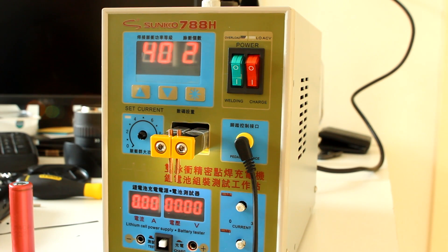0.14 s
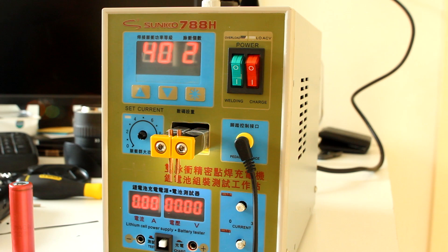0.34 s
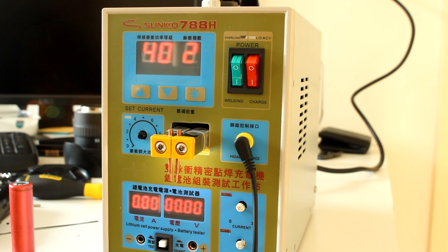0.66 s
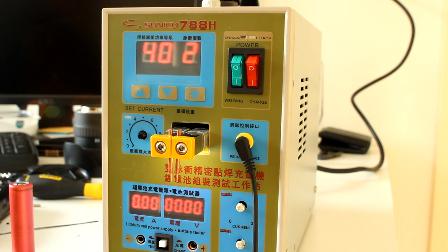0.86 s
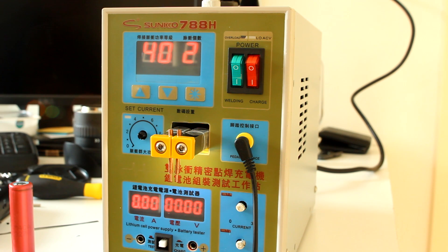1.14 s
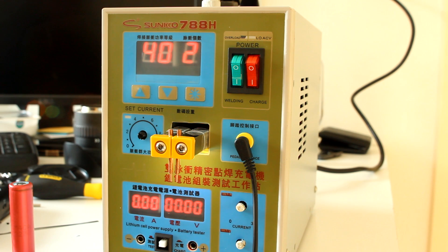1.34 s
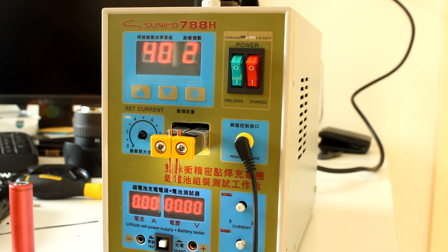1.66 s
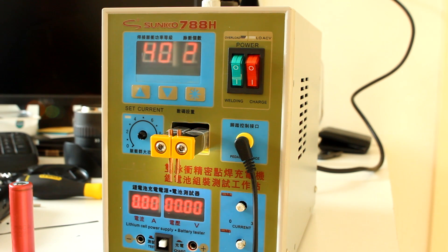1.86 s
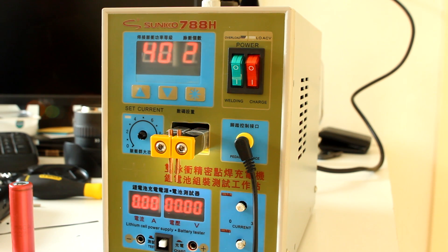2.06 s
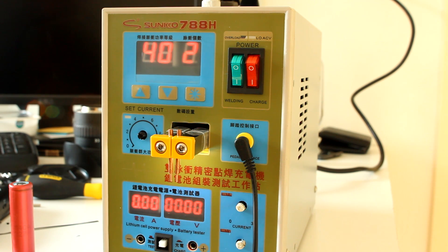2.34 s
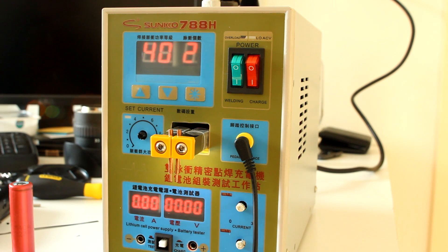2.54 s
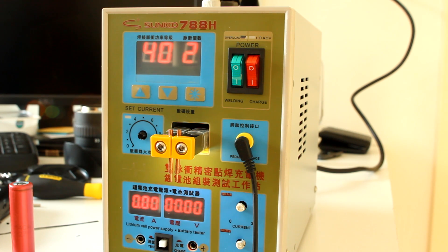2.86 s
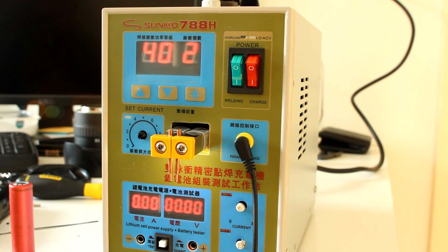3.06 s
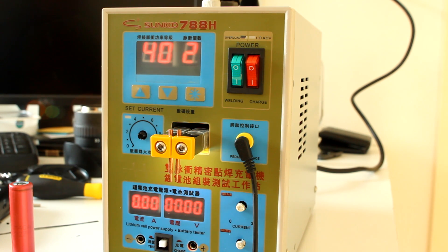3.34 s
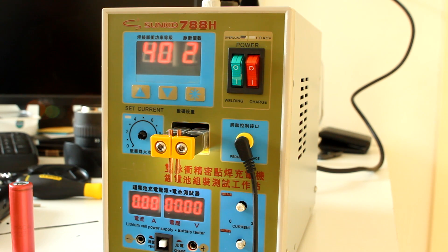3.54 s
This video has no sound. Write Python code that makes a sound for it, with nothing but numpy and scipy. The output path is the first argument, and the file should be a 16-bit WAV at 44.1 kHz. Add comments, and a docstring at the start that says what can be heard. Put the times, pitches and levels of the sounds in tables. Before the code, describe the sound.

A foot pedal switch clacks irregularly in a small live room. Loose knocks fall at 0.1-0.2 and 0.4 seconds, around a faint motor whine that stops by 0.75. A light tick at 0.8, a thump and snapping clack near 1.1, then soft rustle. Scrapes lead into click clusters at 1.8, 2.1, 2.45 and 2.75; after a pause, a last light click at 3.6. Faint hum, hiss and deep rumble continue.

```python
"""A foot pedal's treadle ticks and knocks against its housing, on the floor of a small, live room.
Each knock is a blow spectrum ringing the housing, heard as a direct crack and as echoes from the walls.
The switch inside snaps over with a thin metal ring, the hinge scrapes, and the foot thumps and rustles.
Behind it lie sine mains hum, noise-made hiss and slow deep rumble and, at first, a motor's thin whine."""
import sys
import numpy as np
from scipy import signal
from scipy.fft import rfft, irfft, next_fast_len
from scipy.io import wavfile
from scipy.ndimage import uniform_filter1d

SR = 44100
rng = np.random.default_rng(int(sys.argv[2]) if len(sys.argv) > 2 else 0)


def wrap_up_sound(samples):
    """Save the sound to the file named by the first command line argument, as 16-bit audio."""
    columns = np.atleast_2d(samples).T
    # keep every value between -1 and 1, then stretch to whole-number steps
    tamed = np.clip(columns, -1, 1)
    steps = np.round(tamed * 32767).astype(np.int16)
    wavfile.write(sys.argv[1], SR, steps)


N = 163170

# Room noise spectrum, shape only: pitch_hz [Hz], density_db [relative dB]
AIR_COLOUR = [(30, -88), (48, -77), (75, -100), (110, -102.5), (170, -101), (250, -100), (380, -109),
              (1000, -114), (3000, -118), (8000, -121), (15500, -124)]
AIR_DB = -64.5  # rms level
# Slow swells of the deep rumble: time_s [s], level_db [dB rms]
RUMBLE_SWELL = [(0.0, -57), (0.17, -43.5), (0.5, -54.5), (1.51, -36.5), (1.9, -47.5), (1.93, -34),
                (2.67, -48), (2.76, -45), (3.7, -52.5)]
# Rumble spectrum, shape only: pitch_hz [Hz], level_db [relative dB]
RUMBLE_COLOUR = [(1, 5.5), (4, 9.5), (9, -0.5), (17, 3), (25, -42.5), (35, -43), (70, -65.5), (200, -120)]
# Mains hum lines: pitch_hz [Hz], level_db [dB rms]
HUM_LINES = [(48, -78.5), (102, -79), (248, -88.5)]

# Runs of a small motor: start_s [s], end_s [s], level_db [dB rms of the upper line]
MOTOR_RUNS = [(-.05, 0.213, -78.5), (0.453, 0.743, -74)]
WHINE_HZ, WHINE_SUB_DB = 1238, -11  # upper line; level of the octave below, relative to it

# Decay of the room by pitch: pitch_hz [Hz], t60_s [s to fall 60 dB]
ROOM_T60 = [(100, 0.38), (250, 0.35), (500, 0.39), (1200, 0.35), (2500, 0.32), (5000, 0.31), (10000, 0.2),
            (15000, 0.26)]
FIRST_WALL_S, ROOM_BUILD_S = 0.0043, 0.004  # onset of the echoes, time constant of their build-up
WALL_GRAIN, WALL_GRAIN_S = 0.3, 0.02  # how much single early echoes stand out, how soon they merge
ECHO_EVEN_HZ = 76  # bandwidth over which the random echo noise is evened out in strength
WALLS_DB = -6.5
# Direct path, shaded by the foot: pitch_hz [Hz], level_db [dB]
DIRECT_COLOUR = [(100, -8.5), (700, -1), (1300, -5.5), (2200, -9), (4000, -7.5), (12000, -10.5)]
CHATTER_S, CHATTER_DB = 0.0028, 9.5  # span of the chatter as faces meet; its energy over the single click
RIPPLE_DB, RIPPLE_STEP_HZ, RIPPLE_FROM_HZ = 4.5, 110.3, 2420  # spread, spacing, pitch of full spread

# Foot thumps: peak_s [s], level_db [dB before the room]
THUMPS = [(1.029, -41), (1.085, -61), (2.153, -48), (3.56, -52)]
# Thump spectrum, shape only: pitch_hz [Hz], level_db [relative dB]
THUMP_COLOUR = [(60, -14), (180, -15), (275, 6.5), (340, -9), (450, -14), (800, -39), (2500, -57)]
THUMP_RISE_S, THUMP_FALL_S, THUMP_DIRECT_DB = 0.011, 0.007, -3  # time constants, direct path gain
# Swell of the soft low rustle: time_s [s], level_db [dB rms]
RUSTLE_SWELL = [(1.0, -110), (1.25, -67.5), (1.48, -68), (1.62, -74), (1.75, -75.5), (2.0, -110)]
# Rustle spectrum, shape only: pitch_hz [Hz], level_db [relative dB]
RUSTLE_COLOUR = [(80, -38), (230, 12), (330, -6), (440, 9), (800, -5), (1200, -4.5), (2000, -11.5),
                 (6000, -17), (15000, -24)]

# Switch snaps: time_s [s], level_db [dB before colour], ring_hz [Hz], ring_lift_db [dB]
SNAPS = [(1.1309, -15, 8920, 22), (1.809, -33, 9600, 27), (1.867, -14, 9700, -2), (2.07, -14.5, 9800, 11),
         (2.498, -15, 11300, 2), (2.763, -16, 9680, 11.5), (3.663, -14.5, 9600, -1)]
# Broad colour of a snap: pitch_hz [Hz], level_db [dB]
SNAP_COLOUR = [(100, 8), (600, -17), (1200, -1), (2000, -3), (4500, -3), (6200, -8), (7300, -13.5),
               (11000, -8), (15500, -17)]
# Resonances of the switch: pitch_hz [Hz], width_hz [Hz], lift_db [dB]
SWITCH_MODES = [(1770, 130, 6), (2530, 260, 10), (3800, 500, 4), (4850, 450, 3), (5430, 450, 5),
                (6200, 450, 5)]
RING_WIDTH_HZ, SNAP_DIRECT_DB = 970, -3

# Hinge scrapes as the treadle starts to move: start_s [s], end_s [s], level_db [dB reached at the end]
SCRAPES = [(0.723, 0.799, -59), (1.754, 1.813, -53), (2.417, 2.446, -56.5), (2.714, 2.768, -60.5),
           (3.532, 3.593, -63)]
# Scrape spectrum, shape only: pitch_hz [Hz], level_db [relative dB]
SCRAPE_COLOUR = [(60, -18), (250, 12.5), (500, -10), (1250, 6.5), (2500, -13.5), (4000, -9.5), (12000, -29)]
SCRAPE_GRAIN, SCRAPE_RISE_DB, SCRAPE_DIRECT_DB = 0.25, 12.5, 4  # log gain spread, swell, direct path

# Treadle contacts: time_s [s], six blow levels at the KNOCK_HZ pitches [dB before the housing],
# direct_db [dB], favoured spot_hz [Hz], spot_lift_db [dB]
KNOCKS = [ (0.1281, -21, -23, -16, -25, -20.5, -38, -4, 800, 13),
          (0.1399, 5, 4.5, -10, -6, -26, -29, 1.5, 737, 9.5),
          (0.1824, -9, -5.5, -4.5, -9, -18, -31, 0.5, 910, 3.5),
          (0.3848, -8, -20, -20, -25, -32, -46, 2.5, 1300, 1),
          (0.4052, -6, -2, 1, -0.5, -19.5, -27, 0, 1970, 3),
          (0.4446, -3, 1.5, -4.5, -9, -17, -29.5, -1.5, 304, 6),
          (0.7814, -10, -17, -11, -23, -31, -54, -1, 1380, 9),
          (1.027, -17, -11, -23.5, -41, -39, -58, -2, 290, 10),
          (1.1142, -3.5, -9.5, -17, -13.5, -14.5, -29, -8, 2430, 5.5),
          (1.134, 1.5, -3, -10, -9.5, -10.5, -35, -3.5, 490, 10),
          (1.761, -14, -28, -18.5, -22, -36, -66, 1, 1400, 5),
          (1.794, -10, -9, -27, -18, -17, -21.5, -17, 2500, 2),
          (1.811, -17, -16, -6, -7, -12, -37, 1.5, 1360, 7.5),
          (1.8296, -49, -19, -11, -19, -29, -25, 3, 1400, 4),
          (2.057, -2.5, -7, -9, -14, -23, -39, -2.5, 1210, 2.5),
          (2.0773, -8, -3.5, 0, -5, -16, -31, -1.5, 1250, 3),
          (2.092, 6.5, -3, 2, -12, -17, -27, -1, 245, 4),
          (2.4363, -6, -12.5, -3, -11.5, -27, -69, -6.5, 1190, 8.5),
          (2.478, -11, -32, -15, -31, -43, -51, 6.5, 1130, 3),
          (2.7521, 2.5, -3, -20, -20, -25, -36, -5, 254, 1),
          (2.764, 1, -14, -11.5, -15.5, -27, -27, -7.5, 910, 0),
          (2.792, -2.5, -5.5, -13, -20.5, -22.5, -39, 0, 780, 6),
          (3.5803, -12.5, -20, -16.5, -41, -41, -62, -1.5, 1180, 5)]
# Pitches of the six blow levels: pitch_hz [Hz]
KNOCK_HZ = [120, 650, 1300, 2100, 3500, 10000]
# Resonances of the pedal housing: pitch_hz [Hz], width_hz [Hz], lift_db [dB]
HOUSING_MODES = [(673, 50, 8), (827, 40, 6), (905, 35, 8), (982, 24, 8), (1132, 90, 5.5), (1200, 16, 5),
                 (1301, 36, 6), (1400, 24, 6), (1595, 40, 8), (1780, 24, 8), (2125, 110, 13),
                 (2350, 300, 9.5), (3030, 90, 8)]
# Broad colour of housing and floor: pitch_hz [Hz], level_db [dB]
HOUSING_TILT = [(30, -10.5), (75, -6.5), (108, 9.5), (140, 4), (190, -15), (248, 5.5), (310, -7),
                (400, -10.5), (520, -10.5), (740, -6.5), (1300, -0.5), (1900, -8), (3300, -1.5),
                (3800, 5.5), (4300, -1.5), (4850, -2), (6500, -2.5), (10000, -0.5), (15500, -6)]
SPOT_WIDTH = 0.25  # width of the favoured resonance as a share of its pitch

TOP_HZ = 15850  # band limit of the recorder


def amp(db):
    """Decibels to gain."""
    return 10 ** (np.asarray(db) / 20)


def along(points, hz):
    """(pitch_hz, value) points joined on a log pitch axis."""
    pitch_hz, value = np.transpose(points)
    return np.interp(np.log(hz + 1), np.log(pitch_hz + 1), value)


def lift(resonances, hz):
    """The dB that a set of resonances adds at each pitch."""
    return sum(db / (1 + (2 * (hz - centre) / width) ** 2) for centre, width, db in resonances)


def noise(colour):
    """Coloured noise of rms 1."""
    spectrum = rfft(rng.standard_normal(N)) * amp(along(colour, np.fft.rfftfreq(N, 1 / SR)))
    x = irfft(spectrum, N)
    return x / x.std()


def swell(rows):
    """A gain per sample from (time_s, level_db) points."""
    return amp(np.interp(np.arange(N) / SR, *np.transpose(rows)))


def tones(lines):
    """Steady sines at random phase from (pitch_hz, dB rms) rows."""
    t = np.arange(N) / SR
    return sum(np.sqrt(2) * amp(db) * np.sin(2 * np.pi * (hz * t + rng.random())) for hz, db in lines)


def background():
    """Room noise with its hiss, deep rumble that slowly swells, and steady mains hum."""
    air = amp(AIR_DB) * noise(AIR_COLOUR)
    rumble = swell(RUMBLE_SWELL) * noise(RUMBLE_COLOUR)
    return air + rumble + tones(HUM_LINES)


def whine():
    """A small motor runs twice: one thin line with a weaker one an octave below."""
    t = np.arange(N) / SR
    running = 0
    for start, end, db in MOTOR_RUNS:
        running += amp(db) * np.clip(np.minimum(t - start, end - t) * 50, 0, 1)  # 20 ms fades
    return running * tones([(WHINE_HZ, 0), (WHINE_HZ / 2, WHINE_SUB_DB)])


def ringing(level_db, size=16384):
    """The causal (minimum-phase) ring of a body whose response in dB is a function of pitch."""
    cepstrum = irfft(np.log(amp(level_db(np.fft.rfftfreq(size, 1 / SR)))))
    cepstrum[1:size // 2] *= 2
    cepstrum[size // 2 + 1:] = 0
    return irfft(np.exp(rfft(cepstrum)))


def walls():
    """Echoes of the room: noise that dies at its own pace in each band, grainy early on, then merged."""
    size = 256
    hz, s, z = signal.stft(rng.standard_normal(SR), SR, nperseg=size)
    decay = amp(-60 * s / along(ROOM_T60, hz)[:, None])
    tail = signal.istft(z * decay, SR, nperseg=size)[1][:SR]
    t = np.arange(SR) / SR
    spread = WALL_GRAIN * np.exp(-t / WALL_GRAIN_S)
    echoes = np.repeat(rng.standard_normal(SR), 20)[:SR]  # each held for 20 samples
    build_up = 1 - np.exp(-np.maximum(t - FIRST_WALL_S, 0) / ROOM_BUILD_S)
    tail *= np.exp(spread * echoes - spread ** 2) * build_up
    power = np.abs(rfft(tail)) ** 2  # one second long, so one bin per Hz
    broad_power = uniform_filter1d(power, 20 * ECHO_EVEN_HZ)
    uneven = np.abs(uniform_filter1d(power, ECHO_EVEN_HZ) / broad_power)
    tail = irfft(rfft(tail) / np.sqrt(uneven), SR) * (t < 0.85)
    return tail / np.linalg.norm(tail)


def direct_crack():
    """The direct sound: a click amid brief noise as the faces chatter, shaded by the foot."""
    t = np.arange(SR) / SR
    chatter = rng.standard_normal(SR) * t * np.exp(-2 * t / CHATTER_S)
    click = np.arange(SR) == int(CHATTER_S * SR / 2)
    crack = amp(CHATTER_DB) * chatter / np.linalg.norm(chatter) + click
    shading = ringing(lambda hz: along(DIRECT_COLOUR, hz))
    return signal.fftconvolve(crack / np.linalg.norm(crack), shading)[:SR]


def room(direct_db):
    """One contact's path to the microphone: the direct crack plus the walls."""
    return amp(WALLS_DB) * walls() + amp(direct_db) * direct_crack()


def ripple():
    """Many small upper modes, drawn anew at each call, as dB by pitch."""
    centres = np.arange(int(SR / RIPPLE_STEP_HZ)) * RIPPLE_STEP_HZ
    depth = RIPPLE_DB * np.minimum(centres / RIPPLE_FROM_HZ, 1) ** 2
    heights = depth * rng.standard_normal(SR)[:len(centres)]
    return lambda hz: np.interp(hz, centres, heights)


def add(track, time_s, level_db, path):
    """Ring a body of the given response, with its own small modes, and send it along the path."""
    start, small_modes = round(time_s * SR), ripple()
    ring = ringing(lambda hz: level_db(hz) + small_modes(hz))
    hit = signal.fftconvolve(ring, path)[:N - start]
    track[start:start + len(hit)] += hit


def foot():
    """The sole settles on the pedal with dull noise thumps that swell in softly, and rustles."""
    t = np.arange(N) / SR
    pressure = 0
    for peak, db in THUMPS:
        pressure += amp(db) * np.exp(-np.maximum((peak - t) / THUMP_RISE_S, (t - peak) / THUMP_FALL_S))
    thumps = signal.fftconvolve(pressure * noise(THUMP_COLOUR), room(THUMP_DIRECT_DB))[:N]
    return thumps + swell(RUSTLE_SWELL) * noise(RUSTLE_COLOUR)


def switch():
    """The spring snaps over: a bright click through the switch's resonances with a thin high ring."""
    out = np.zeros(N)
    for time_s, db, ring_hz, ring_db in SNAPS:
        modes = SWITCH_MODES + [(ring_hz, RING_WIDTH_HZ, ring_db)]
        add(out, time_s, lambda hz: db + along(SNAP_COLOUR, hz) + lift(modes, hz), room(SNAP_DIRECT_DB))
    return out


def hinge():
    """Grainy friction noise swells into the housing and stops at its loudest."""
    t = np.arange(N) / SR
    force = 0
    for start, end, db in SCRAPES:
        rise_db = SCRAPE_RISE_DB * np.clip((t - end) / (end - start), -1, 0)
        force += amp(db + rise_db) * (t > start) * (t < end)
    friction = rng.standard_normal(N)
    grain_gain = np.repeat(np.exp(SCRAPE_GRAIN * rng.standard_normal(N)), 20)[:N]  # 20 samples a grain
    grains = friction * grain_gain
    ring = ringing(lambda hz: along(SCRAPE_COLOUR, hz) + lift(HOUSING_MODES, hz))
    body = signal.fftconvolve(ring, room(SCRAPE_DIRECT_DB))
    return signal.fftconvolve(force * grains / grains.std(), body / np.linalg.norm(body))[:N]


def treadle():
    """Each contact rings the same housing with its own blow; the spot it hits favours one resonance."""
    out = np.zeros(N)
    for time_s, *levels, direct_db, spot_hz, spot_db in KNOCKS:
        blow = list(zip(KNOCK_HZ, levels))
        modes = HOUSING_MODES + [(spot_hz, SPOT_WIDTH * spot_hz, spot_db)]
        add(out, time_s, lambda hz: along(blow, hz) + along(HOUSING_TILT, hz) + lift(modes, hz),
            room(direct_db))
    return out


def scene():
    """The pedal and the room at one microphone."""
    return (treadle() + hinge() + switch() + foot() + whine() + background())[None]


def record(dry):
    """The recorder keeps nothing above its band limit."""
    size = next_fast_len(N + SR // 2)
    passed = np.fft.rfftfreq(size, 1 / SR) < TOP_HZ
    return irfft(rfft(dry, size) * passed, size)[..., :N]


dry = scene()
out = record(dry)
wrap_up_sound(out)
```